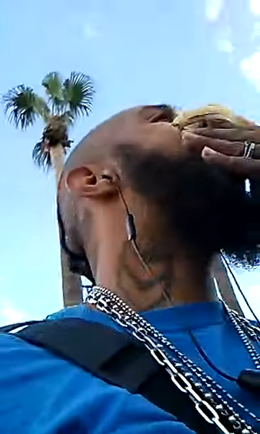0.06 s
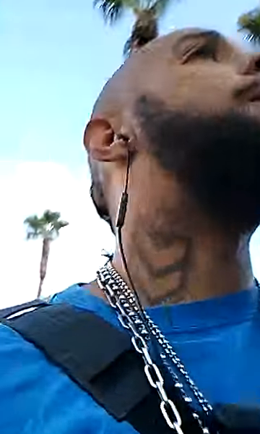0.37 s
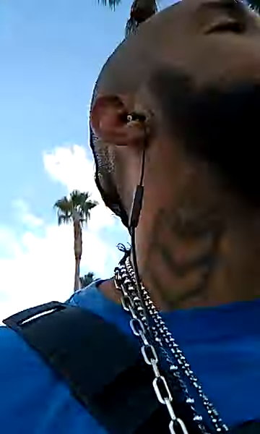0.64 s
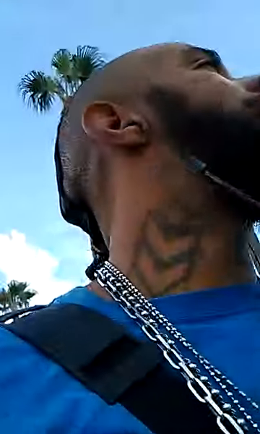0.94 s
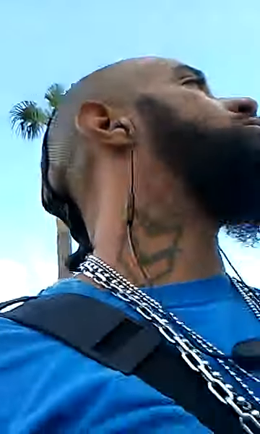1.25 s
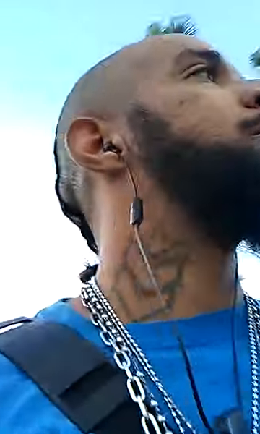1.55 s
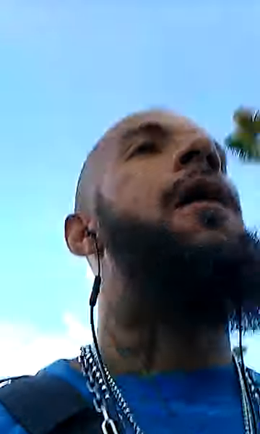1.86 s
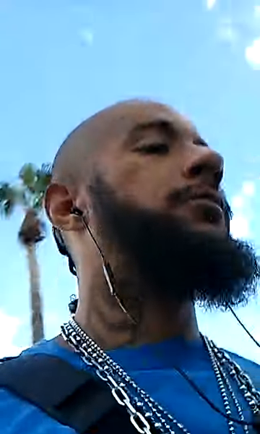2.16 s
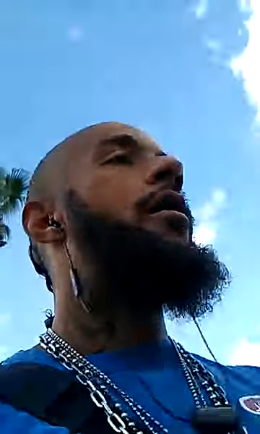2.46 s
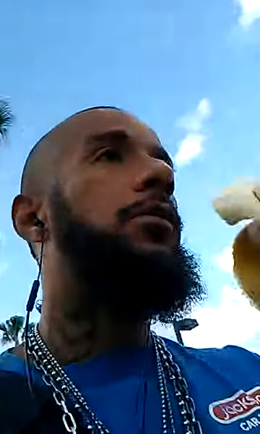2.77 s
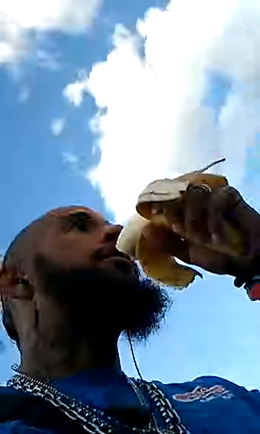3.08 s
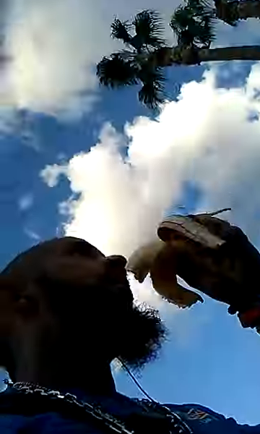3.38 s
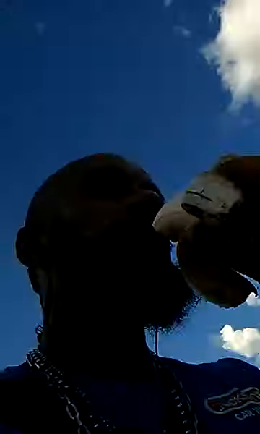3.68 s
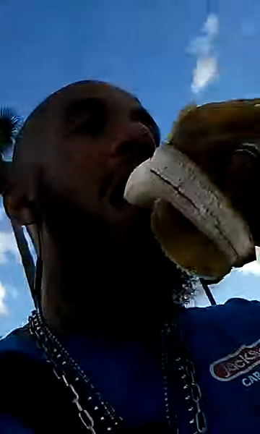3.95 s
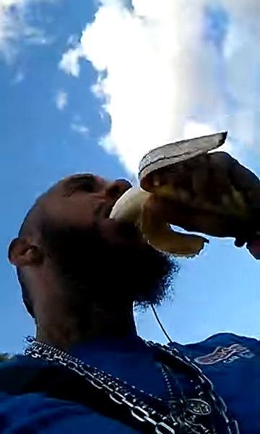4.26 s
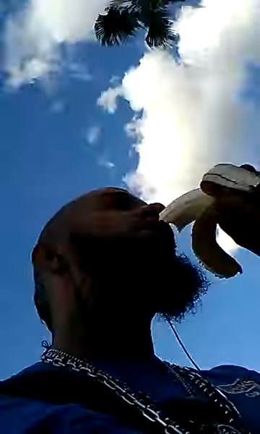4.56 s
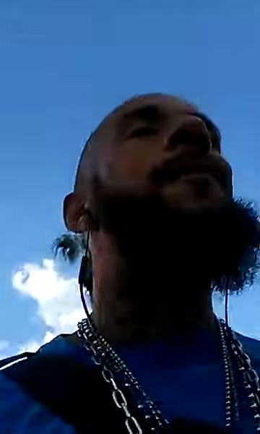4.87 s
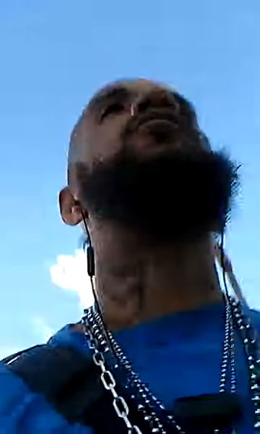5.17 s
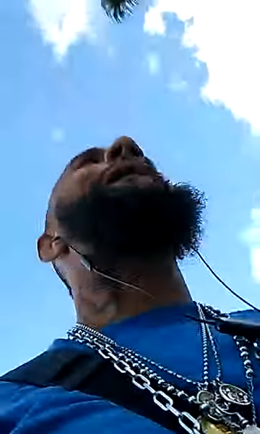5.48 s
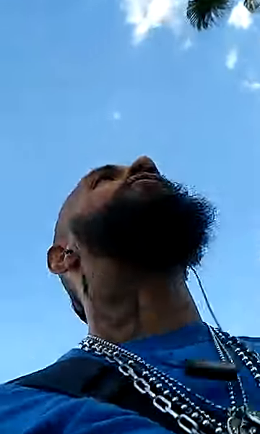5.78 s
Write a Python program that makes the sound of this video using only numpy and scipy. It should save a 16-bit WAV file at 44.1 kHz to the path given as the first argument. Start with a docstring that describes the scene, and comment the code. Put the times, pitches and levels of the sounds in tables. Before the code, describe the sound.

Metal chain necklaces jingle close to the microphone for about six seconds, on someone walking outdoors. The links slide, rattle and clink in uneven bursts with each sway, thin and bright, with a few small dull knocks. A medallion rings against them and a small pendant adds very high pings, strongest around 1 to 1.7 seconds. The jingling stays busy until about 3 seconds, then thins to scattered clinks. A dense run of clinks returns at about 5 seconds and carries on, a little lighter, to the end. Behind it, far traffic hums softly, its tone sweeping slightly and growing a little louder in the second half. Brief low puffs of wind come near 2.1, 3.7 and 4.9 seconds, the middle one strongest. A distant bird gives one very faint, thin whistle from about 4 to 4.4 seconds.

```python
"""Chain necklaces jingle close by, on the chest of someone walking outdoors.
Each sway of the body makes the links slide, rattle and ring. A medallion swings into them and rings
with several notes at once, and a small pendant gives very high pings.
Behind them is the hum of far traffic, whose tone sweeps as the microphone moves,
with a few low puffs of wind and one faint bird whistle."""
import sys
import numpy as np
from scipy import signal
from scipy.fft import rfft, irfft, next_fast_len
from scipy.io import wavfile
from scipy.ndimage import uniform_filter1d

SR = 44100
rng = np.random.default_rng(int(sys.argv[2]) if len(sys.argv) > 2 else 0)


def to_wav(sig):
    """Store sig (one row per channel, or 1-D mono) as 16-bit WAV at the path in sys.argv[1].

    Samples outside -1..1 are clipped; the rate is SR.
    """
    pcm = np.clip(np.atleast_2d(sig), -1, 1) * 32767
    pcm = np.round(pcm).astype(np.int16)
    wavfile.write(sys.argv[1], SR, pcm.T)  # frames by channels


N = 265923
TIME = np.arange(N) / SR
RING_TIME = TIME[:SR // 5]  # 0.2 s for one hit to ring

# Levels are relative: the functions add their own gains. t60 is the time a sound takes to fade 60 dB.
# tone of the far traffic: f/Hz, level/dB
TRAFFIC_TONE = [(25, -22), (45, -33), (75, -8), (100, 8), (140, -3.5), (280, -5), (500, -9.5), (800, -8.5),
                (1100, -13), (1450, -8), (2100, -22), (4000, -22.5), (15500, -20.5)]
# how the traffic swells: t/s, level/dB
TRAFFIC_SWELL = [(0, -1), (3.7, 3), (4.3, 0), (4.6, 4.5), (6, 6.5)]
# how strongly each pitch follows that swell: f/Hz, level/dB
SWELL_DEPTH = [(100, -12), (300, -3.0), (2000, 3.5), (6000, -15.5)]
# tone of the traffic's echo off the body: f/Hz, level/dB
ECHO_TONE = [(250, -5), (550, 2.5), (1900, -6.5), (4000, -35)]
# spacing of the pitches that this echo boosts (1 / its delay): t/s, f/Hz
ECHO_SPACING = [(0, 1520), (1.3, 1550), (1.9, 1140), (2.35, 1430), (2.8, 950), (3.05, 820), (3.25, 1290),
                (3.55, 1740), (3.85, 870), (4.3, 940), (4.5, 1460), (4.7, 1460), (4.95, 970), (5.3, 1020),
                (5.5, 1580), (6.03, 1620)]
# wind puffs: t/s, level/dB, length/s
WIND_PUFFS = [(2.09, -54, 0.098), (3.689, -43.5, 0.16), (4.284, -69, 0.041), (4.863, -56.5, 0.21)]
# tone of the wind: f/Hz, level/dB
WIND_TONE = [(20, -10), (45, -4), (85, 4.5), (150, -10), (230, -11), (400, -45), (1500, -66)]
# the bird's whistle: t/s, f/Hz, level/dB
BIRD_WHISTLE = [(3.98, 2230, -83), (4.09, 2320, -67), (4.13, 2500, -67), (4.165, 2710, -99),
                (4.19, 2870, -69), (4.35, 2810, -75), (4.41, 2680, -93)]
# sways that drag the chains along: t/s, length/s, level/dB, brightness/dB
BODY_SWAYS = [(0, 0.12, -51, 3), (0.397, 0.079, -53.5, 10), (0.557, 0.094, -48, 2),
              (0.887, 0.2, -52.5, 10.5), (1.114, 0.33, -47, 11), (1.741, 0.34, -48, -0.5),
              (2.225, 0.054, -47, 3), (2.34, .3, -51, 2.5), (2.718, 0.1, -44.5, -15),
              (2.974, 0.069, -48, -11), (3.208, 0.092, -56.5, 6), (3.715, 0.053, -46, 1),
              (3.881, .115, -48.5, -6.5), (4.521, .4, -59.5, -2), (4.988, .29, -49, -6),
              (5.671, 0.048, -48, 2.5), (5.84, 0.02, -46, 5.5), (5.98, .09, -46.5, 8.5)]
# sliding that goes on between sways: t/s, level/dB
RESTING_SLIDE = [(0, -71), (.8, -58.5), (2, -58), (3.6, -62), (4.1, -62), (4.45, -70), (5, -56),
                 (6.03, -58)]
# tone of sliding: f/Hz, level/dB
SLIDE_TONE = [(1500, -8), (3800, -14), (4750, -7), (5300, -17), (5900, 5.5), (6800, -20.5), (7600, 6.5),
              (9500, -0.5), (12000, -7), (15500, -12)]
# tone of a click: f/Hz, level/dB
CLICK_TONE = [(300, -28), (2000, -18), (3900, -6.5), (4750, -8), (5300, 1), (6000, -2), (7000, 9.5),
              (8200, 7), (9700, 11.5), (11500, -1), (13000, -8.5), (16500, -7)]
# tone of a click's bright edge: f/Hz, level/dB
EDGE_TONE = [(3000, -113), (11000, -16), (13200, 0), (14600, -3), (15300, 19.5), (15900, -44), (16600, -17)]
# dull knocks, some from a small plastic remote tapping: t/s, level/dB, f/Hz, t60/s
DULL_KNOCKS = [(0.237, -44, 483, 0.011), (1.136, -48, 1230, 0.075), (1.163, -49.5, 2730, 0.053),
               (1.253, -37, 1420, 0.0069), (1.2555, -40, 500, 0.0094), (1.379, -39.5, 460, 0.016),
               (1.889, -42, 4800, 0.011), (2.07, -51.5, 1000, .25), (2.305, -29, 3260, 0.022),
               (2.32, -35.5, 2600, 0.0075), (2.588, -41.5, 3100, 0.0042), (2.879, -44.5, 2830, 0.012),
               (4.717, -41.5, 497, 0.016), (5.139, -48, 4700, 0.0092), (5.406, -44.5, 4500, .01),
               (5.657, -44.5, 4000, 0.05)]
# metal squeaking on metal: t/s, level/dB, f/Hz, length/s
LINK_SQUEAKS = [(1.643, -18, 9100, 0.0052), (1.681, -34, 13300, 0.0027)]
# the medallion's own notes: f/Hz, level/dB, t60/s
MEDALLION_NOTES = [(3956, -16, 0.04), (5930, -1.5, 0.024), (7260, -20, 0.08), (7250, -19, 0.058),
                   (8900, -7, 0.023), (10780, 3.5, 0.053), (10000, -36, .04), (12800, -24, 0.034),
                   (15300, 2, 0.022)]
# the medallion's hardest swings: t/s, level/dB
MEDALLION_HITS = [(.019, -42.5), (.0427, -41.5), (.1574, -39), (.259, -46.5), (.416, -52), (.565, -52),
                  (1.1182, -41), (1.2533, -32.5), (1.2802, -56), (1.3248, -33.5), (1.3418, -39),
                  (1.386, -36.5), (1.8435, -41), (1.887, -43), (1.9448, -49), (1.97, -42), (2.3843, -50),
                  (3.008, -47), (3.257, -58), (4.581, -53), (4.659, -51), (4.691, -47.5), (5.7, -42),
                  (5.85, -42)]
# hits on the small pendant: t/s, level/dB, t60/s
PENDANT_HITS = [(.071, -16.5, 0.029), (.157, -18, .043), (.486, -30, 0.048), (.93, -16, 0.074),
                (0.9867, -0.5, 0.1), (1.036, -17.5, 0.14), (1.0715, -13, 0.057), (1.143, -11, 0.064),
                (1.1932, 0.5, 0.051), (1.5576, -14, 0.15), (1.567, -11.5, 0.038), (1.6435, -14, 0.1),
                (1.814, -21, .026), (2.511, -21, 0.028), (2.602, -11.5, 0.044), (2.668, -18, 0.055),
                (3.823, -29.5, 0.059), (4.92, -21.5, 0.048), (5.636, -26, .015), (5.657, -20, .028),
                (5.824, -23, .055), (5.934, -20.5, 0.082)]
# notes of a typical link: f/Hz, level/dB, t60/s
LINK_NOTES = [(6770, 7.5, 0.026), (7430, -26, 0.011), (5990, -2.5, 0.037), (4840, -19, 0.045)]
# notes of the big oval links: f/Hz, level/dB, t60/s
BIG_LINK_NOTES = [(4774, -7, 0.015), (5420, -23.5, 0.0063)]
# the loudest link hits: t/s, click level/dB, rattle fade/s, ring level/dB
LINK_HITS = [(.0191, -43, 0.021, -53), (.0715, -46, 0.0062, -48), (.158, -47, 0.12, -46.5),
             (.5938, -43.5, .039, -48), (.623, -39.5, 0.097, -68), (.93, -45.5, 0.013, -70),
             (.9862, -41, 0.057, -53), (1.0434, -38, 0.0061, -46), (1.1027, -37, 0.0081, -63),
             (1.1369, -36.5, 0.22, -49), (1.1647, -32.5, 0.0081, -63), (1.2553, -39, 0.062, -37.5),
             (1.2804, -48, .0093, -66), (1.3252, -51, .044, -34.5), (1.3413, -39, 0.024, -40),
             (1.387, -44, .0072, -49), (1.395, -59, 0.02, -38.5), (1.408, -57, .053, -45),
             (1.4533, -54, .032, -42.5), (1.654, -37.5, 0.11, -47), (1.7527, -38, .059, -39.5),
             (1.7717, -44, 0.021, -40.5), (1.7964, -35.5, 0.064, -49), (1.8134, -32, 0.018, -60),
             (1.8447, -37.5, .025, -46), (1.8734, -39, 0.0067, -68), (1.8872, -31, .013, -34),
             (1.916, -39, 0.02, -45), (1.9428, -51, .027, -42.5), (1.9793, -36.5, 0.0054, -38),
             (2.035, -39.5, 0.014, -34), (2.2266, -40.5, 0.16, -49), (2.3041, -37, 0.0065, -40),
             (2.338, -33, 0.012, -65), (2.3863, -43, .023, -42.5), (2.4242, -38.5, 0.03, -66),
             (2.6, -40, 0.047, -62), (2.7221, -36.5, 0.0036, -73), (2.7462, -31, 0.0066, -60),
             (2.8496, -45, .019, -41.5), (2.8675, -36.5, 0.078, -45), (2.9862, -38.5, 0.004, -68),
             (3.0061, -42, 0.01, -60), (3.0478, -46, .0085, -70), (3.534, -48, 0.0068, -119),
             (3.743, -47, 0.03, -57), (3.8884, -45, 0.023, -67), (3.928, -35.5, 0.0078, -60),
             (3.9902, -44.5, 0.051, -46), (4.7151, -37.5, 0.017, -73), (4.937, -48.5, 0.016, -46.5),
             (5.0356, -33.5, 0.15, -41.5), (5.0647, -44, 0.034, -41), (5.105, -38.5, 0.11, -40),
             (5.1385, -26, 0.0037, -35), (5.189, -39, 0.0076, -48), (5.2077, -36, 0.16, -43),
             (5.2587, -42, 0.016, -39), (5.283, -37, 0.019, -46), (5.3166, -46, 0.0061, -48.5),
             (5.404, -46.5, 0.0049, -67), (5.413, -42, 0.0024, -75), (5.571, -40.5, 0.013, -50),
             (5.6556, -41, 0.037, -47.5), (5.718, -43, 0.083, -48), (5.823, -43, 0.048, -51),
             (5.8425, -39, 0.0031, -70), (5.8613, -44, 0.024, -42.5), (5.9337, -43, 0.034, -47.5),
             (5.988, -46, 0.035, -38)]


def amp(db):
    """Turns decibels into a gain to multiply by."""
    return 10 ** (np.asarray(db) / 20)


def unit(x):
    """Scales a signal to an average power of 1."""
    return x / np.sqrt(np.mean(x ** 2) + 1e-20)


def curve(rows, column=1):
    """One column of a table, joined by straight lines in time."""
    rows = np.array(rows)
    return np.interp(TIME, rows[:, 0], rows[:, column])


def tone_gain(tone, hz):
    """The gain that a tone table gives at each frequency."""
    table_hz, db = np.transpose(tone)
    return amp(np.interp(np.log(hz + 1), np.log(table_hz), db))


def tint(x, tone):
    """Filters a sound by a tone table."""
    size = next_fast_len(len(x) + 512)
    return irfft(rfft(x, size) * tone_gain(tone, np.fft.rfftfreq(size, 1 / SR)), size)[:len(x)]


def add(mix, s, sound):
    """Mixes a sound in, starting at s seconds."""
    part = mix[max(round(s * SR), 0):][:len(sound)]
    part += sound[:len(part)]


def fade(t60):
    """A gain that falls 60 dB in t60 seconds."""
    return amp(-60 * RING_TIME / max(t60, 1e-3))


def traffic(level_db=-58.5, patchy_db=2.5, echo_gain=.5):
    """Far traffic arrives directly and off the body; the echo's changing delay sweeps the tone."""
    hz = np.fft.rfftfreq(1024, 1 / SR)
    frames = np.minimum(np.arange(N // 256 + 5) * 256, N - 1)
    real, imag, patches = rng.standard_normal((3, len(frames), len(hz)))
    patches = uniform_filter1d(patches, size=14, axis=0)  # smooth over time
    patches = unit(uniform_filter1d(patches, size=8, axis=1))  # and over pitch
    echo_turns = hz / curve(ECHO_SPACING)[frames, None]
    with_echo = abs(1 + echo_gain * tone_gain(ECHO_TONE, hz) * np.exp(2j * np.pi * echo_turns))
    swell_db = curve(TRAFFIC_SWELL)[frames, None] * tone_gain(SWELL_DEPTH, hz)
    noise = (real + 1j * imag) * tone_gain(TRAFFIC_TONE, hz)
    spectrum = noise * with_echo * amp(swell_db + patchy_db * patches)
    hum = signal.istft(spectrum.T, nperseg=1024, noverlap=768)[1][:N]
    no_rumble = signal.butter(3, 58, "high", fs=SR, output="sos")
    return amp(level_db) * unit(signal.sosfilt(no_rumble, hum))


def wind():
    """Air puffs against the microphone and makes brief, low rumbles."""
    strength = sum(amp(db) * np.exp(-2 * np.abs(2 * (TIME - s) / length) ** 3)
                   for s, db, length in WIND_PUFFS)
    return strength * unit(tint(rng.standard_normal(N), WIND_TONE))


def bird(waver=.006):
    """A far bird whistles one thin, wavering note that rises and falls."""
    wobble = unit(uniform_filter1d(rng.standard_normal(N), size=150))
    hz = curve(BIRD_WHISTLE) * (1 + waver * wobble)
    singing = (TIME > BIRD_WHISTLE[0][0]) & (TIME < BIRD_WHISTLE[-1][0])
    whistle = np.sqrt(2) * np.sin(2 * np.pi * np.cumsum(hz) / SR)
    return singing * amp(curve(BIRD_WHISTLE, column=2)) * whistle


def body_motion(rise_s=.014, fall_s=.051):
    """Sways start the chains fast and let them settle slowly; gives level and brightness in dB."""
    power = amp(curve(RESTING_SLIDE)) ** 2
    for s, length, db, _ in BODY_SWAYS:
        away = np.maximum(s - TIME, 0) / rise_s + np.maximum(TIME - s - length, 0) / fall_s
        power = power + (amp(db) * np.exp(-np.minimum(away, 20))) ** 2
    brightness_db = curve([(s + length / 2, bright_db) for s, length, _, bright_db in BODY_SWAYS])
    return 10 * np.log10(power), brightness_db


def chance_touches(per_s, sliding_db, spread_db=8):
    """Random touches, stronger when the chains move more: t/s, level/dB."""
    count = round(per_s * N / SR)
    timing, force = rng.random((count, 2)).T
    at = ((np.arange(count) + timing) / count * (N - 1)).astype(int)
    return zip(at / SR, sliding_db[at] + spread_db * (2 * force - 1))


def ring(notes, detune, scatter, contact_s=.0005):
    """Struck metal rings with fading notes; each hit lands on a new spot and changes their balance."""
    out = 0
    for hz, db, t60 in notes:
        turns = hz * (1 + detune * rng.uniform(-1, 1)) * RING_TIME + rng.random()
        gain = amp(db) * (1 + scatter * rng.uniform(-1, 1))
        out = out + gain * fade(t60) * np.sin(2 * np.pi * turns)
    onset = np.sin(np.pi / 2 * np.minimum(RING_TIME / contact_s, 1)) ** 2
    return np.sqrt(2) * onset * out


def rattle(fade_s, tone, noise_share=.42, samples=2048):
    """Links bounce quickly and unevenly on each other: a short burst of noise and ringing."""
    bounces = amp(6.5 * np.repeat(rng.standard_normal(len(RING_TIME) // 30), 30))
    contact = (rng.standard_normal(len(RING_TIME)) * bounces * fade(.7 * fade_s))[:samples]
    notes = [(hz, 0, np.clip(fade_s, .008, .024)) for hz in np.geomspace(4800, 14500, 9)]
    ringing = signal.fftconvolve(contact, ring(notes, detune=.075, scatter=.6)[:samples])[:samples]
    burst = noise_share ** .5 * unit(contact) + (1 - noise_share) ** .5 * unit(ringing)
    burst = tint(np.pad(burst, (16, 0)), tone)
    no_lows = signal.butter(3, 1700, "high", fs=SR, output="sos")  # the bursts carry no low sound
    burst = signal.sosfilt(no_lows, burst)
    return burst / np.linalg.norm(burst) * np.sqrt(SR / 100)  # the energy of 10 ms at level 1


def sliding(sliding_db, brightness_db, ticks_per_s=190, kinds=24,
            tick_db=-3, cloth_db=-7, edge_db=-3, link_db=-6):
    """Sliding chains make many tiny ticks, each ringing its own links, over a soft rub of cloth."""
    ticks, edges, rings = np.zeros((3, N))
    for _ in range(kinds):
        times = np.flatnonzero(rng.random(N) < ticks_per_s / kinds / SR) / SR
        fade_s = rng.uniform(.004, .02)
        tick, edge = rattle(fade_s, SLIDE_TONE), rattle(fade_s, EDGE_TONE)
        link = ring(LINK_NOTES, detune=.04, scatter=.9)
        sizes = amp(6.5 * np.minimum(rng.exponential(1, len(times)), 2.5))
        for s, size in zip(times, sizes):
            add(ticks, s, size * tick)
            add(edges, s, size * edge)
            add(rings, s, size * link)
    cloth = unit(tint(rng.standard_normal(N), SLIDE_TONE))
    metal = amp(tick_db) * unit(ticks) + amp(link_db) * unit(rings)
    metal += amp(brightness_db + edge_db) * unit(edges)
    return amp(sliding_db) * (amp(cloth_db) * cloth + metal)


def knocks(width_share=.62):
    """Chains and a small plastic remote bump against things: each bump is a wide band of fading noise."""
    out = np.zeros(N)
    for s, db, hz, t60 in DULL_KNOCKS:
        half_width = width_share * hz / 2
        band = signal.butter(2, [max(hz - half_width, 60), hz + half_width], "band", fs=SR, output="sos")
        noise = unit(signal.sosfilt(band, rng.standard_normal(len(RING_TIME))))
        add(out, s, amp(db) * noise * fade(t60))
    return out


def squeaks():
    """A link skids for a few milliseconds and sings one high note."""
    out = np.zeros(N)
    for s, db, hz, length in LINK_SQUEAKS:
        t = np.arange(0, length, 1 / SR)
        note = np.sqrt(2) * np.sin(2 * np.pi * hz * t)
        add(out, s, amp(db) * note * signal.windows.tukey(len(t), .3))
    return out


def medallion(sliding_db, gain_db=2, brushes_per_s=7, brush_db=-9):
    """The disc swings into the chains or brushes them: a tick, then notes that the shirt muffles."""
    out = np.zeros(N)
    brushes = list(chance_touches(brushes_per_s, sliding_db + brush_db))
    for s, db in list(MEDALLION_HITS) + brushes:
        add(out, s, amp(db + gain_db) * ring(MEDALLION_NOTES, detune=.002, scatter=.6))
        add(out, s, amp(db + gain_db) * rattle(.01, EDGE_TONE))
    return out


def pendant(ping_hz=15140, ping_db=-3, tick_db=-24, stop_t60=.024):
    """The small pendant ticks and rings with one very high note until the next hit stops it."""
    out = np.zeros(N)
    gaps = np.diff([row[0] for row in PENDANT_HITS], append=N / SR)
    for (s, db, t60), gap in zip(PENDANT_HITS, gaps):
        stop = amp(-60 * np.maximum(RING_TIME - gap, 0) / stop_t60)
        add(out, s, amp(db + ping_db) * stop * ring([(ping_hz, 0, t60)], detune=.002, scatter=0))
        add(out, s, amp(db + tick_db) * rattle(.12, EDGE_TONE))
    return out


def clinks(sliding_db, brightness_db, edge_db=-2, link_db=3, big_db=4, dull_db=-18):
    """Links hit each other, rattle and ring; the duller the hit, the more the big links sound."""
    light_per_s, light_click_db, light_ring_db, light_fade_s = 12, 1.5, -6.5, .011
    db_per_doubling = 11.5  # long rattles of fine links are brighter than short clacks of big ones
    light_hits = [(s, db + light_click_db, light_fade_s, db + light_ring_db)
                  for s, db in chance_touches(light_per_s, sliding_db)]
    out = np.zeros(N)
    for s, db, fade_s, ring_db in list(LINK_HITS) + light_hits:
        doublings = np.log2(np.clip(fade_s / light_fade_s, .1, 1))
        bright_db = np.interp(s, TIME, brightness_db) + db_per_doubling * doublings
        add(out, s, amp(db) * rattle(fade_s, CLICK_TONE))
        add(out, s, amp(db + bright_db + edge_db) * rattle(fade_s, EDGE_TONE))
        add(out, s, amp(ring_db + link_db) * ring(LINK_NOTES, detune=.025, scatter=.4))
        heaviness = np.clip(bright_db / dull_db, .3, 1.2) ** 2
        add(out, s, heaviness * amp(db + big_db) * ring(BIG_LINK_NOTES, detune=.035, scatter=.3))
    return out


def scene():
    """Jewellery on a swaying body, in front of the street sounds, in one channel."""
    sliding_db, brightness_db = body_motion()
    chains = clinks(sliding_db, brightness_db) + sliding(sliding_db, brightness_db) + squeaks() + knocks()
    jewellery = chains + medallion(sliding_db) + pendant()
    return (jewellery + traffic() + wind() + bird())[None]


def record(dry):
    """Cuts away the very highest treble."""
    cutoff_hz = 16150
    low_pass = signal.firwin(255, cutoff_hz, window=("kaiser", 9), fs=SR)
    return signal.oaconvolve(dry, low_pass[None], "same")


dry = scene()
out = record(dry)
to_wav(out)
```